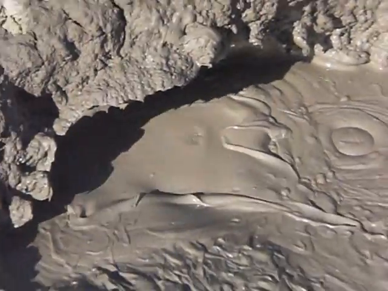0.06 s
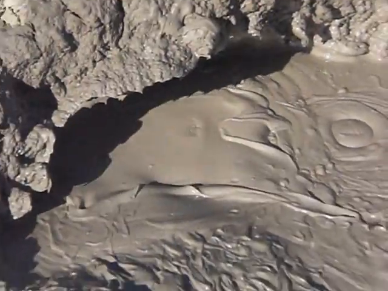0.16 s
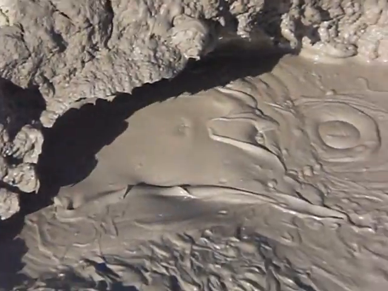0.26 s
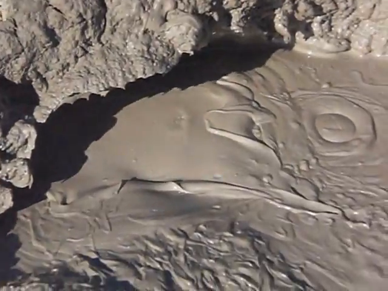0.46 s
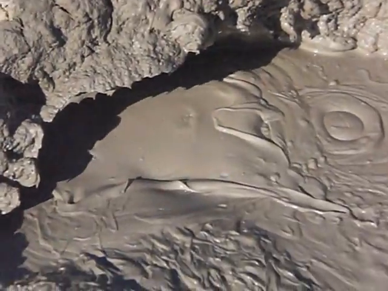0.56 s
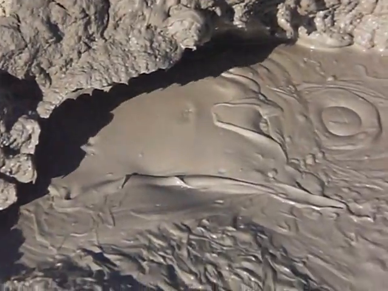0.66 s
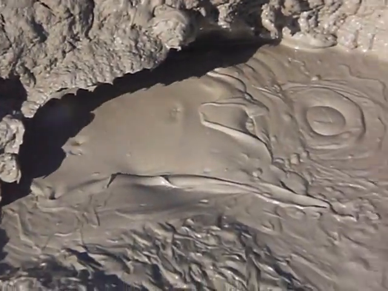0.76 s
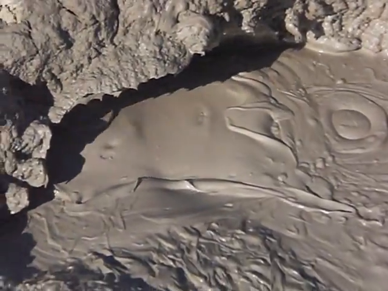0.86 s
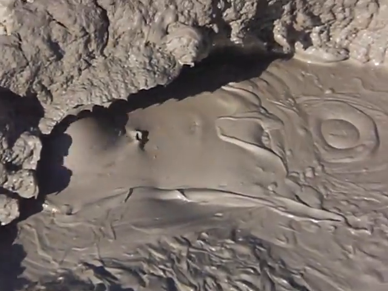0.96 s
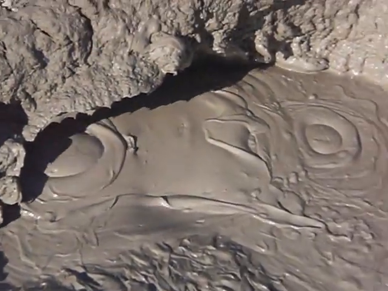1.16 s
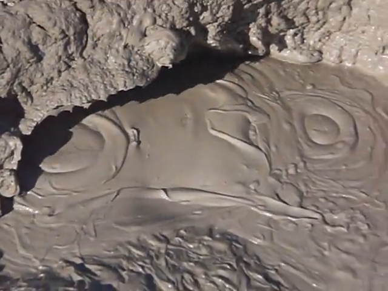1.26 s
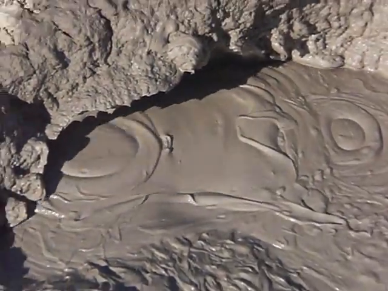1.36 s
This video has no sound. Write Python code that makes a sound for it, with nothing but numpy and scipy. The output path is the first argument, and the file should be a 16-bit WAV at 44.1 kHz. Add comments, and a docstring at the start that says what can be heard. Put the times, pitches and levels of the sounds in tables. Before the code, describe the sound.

Thick mud bubbling with low gulps, wet splutters and small pops outdoors.

```python
"""Thick mud boils in an open pool. Faint outdoor air and small pipping bubbles go on throughout.
First a big pocket of gas gulps up, ringing higher as it nears the surface, and smaller gulps follow.
Just past half a second a large bubble tears open in a wet splutter, its skin ripping in tiny snaps.
At about one second another bursts with a short hiss, and a few last gulps and pips trail off."""
import sys
import numpy as np
from scipy import signal
from scipy.io import wavfile
from scipy.ndimage import uniform_filter1d

SR = 44100
rng = np.random.default_rng(int(sys.argv[2]) if len(sys.argv) > 2 else 0)


def master(y):
    """Save y as 16-bit WAV."""
    cut = np.clip(np.atleast_2d(y).T, -1, 1)
    pcm = np.round(cut * 32767)  # scale
    wavfile.write(sys.argv[1], SR, pcm.astype(np.int16))


N = 61739

# Tone colour of the outdoor air: f/Hz, level/dB
AIR_COLOUR = [(20, -60), (60, 0.5), (160, 5), (430, -1), (1160, -9), (2400, -11), (4000, -16.5),
              (16000, -18.5)]
# Tone colour of wet spray: f/Hz, level/dB
SPRAY_COLOUR = [(150, -49), (500, 7), (1400, 2.5), (2500, 9.5), (4500, 2.5), (6000, 5), (9000, 6.5),
                (12000, 6.5), (16000, 5)]
# Tone colour at the listening spot: softened treble, with one narrow dip
# from sound bouncing off the ground: f/Hz, level/dB
LISTENING_COLOUR = [(20, -0.5), (5200, -0.5), (6300, -2), (7250, -6.5), (7700, -2.5), (16000, -4.5)]
# How long the crater's echo takes to fade by 60 dB: f/Hz, t/s
CRATER_FADE = [(100, 0.19), (500, 0.7), (2500, 0.32), (16000, 0.25)]
# Small bubbles that pop and ring: start t/s, f/Hz, level/dB, t/s to fade by 60 dB, rise/(octaves per s)
SMALL_BUBBLES = [(.0055, 2770, -40.5, .025, -10), (0.1005, 1850, -43, .016, -6),
                 (0.106, 2480, -42, .012, 0), (.222, 2062, -28.5, .035, -5), (0.296, 2280, -31, .03, 16),
                 (0.324, 2356, -40.5, .025, 16), (0.3576, 4770, -37.5, .009, 37),
                 (.397, 1950, -37, .022, -13), (0.399, 4160, -35.5, .016, 19),
                 (.449, 1970, -26.5, .055, 13.5), (.504, 3660, -37, .03, 4.5), (0.513, 4030, -32, .04, 11),
                 (0.5957, 1286, -32, .04, 15), (0.6298, 2700, -21.5, .008, 11),
                 (0.6347, 5840, -6.5, .006, 26), (0.638, 6340, -6, .009, 22), (0.636, 2670, -22, .025, -6),
                 (0.6672, 3930, -28.5, .02, -16), (0.6737, 3000, -29.5, .028, -9),
                 (0.681, 11000, -22, .004, 0), (0.719, 13400, -20, .003, 0), (0.7297, 13400, -12, .003, 3),
                 (0.7474, 9500, -10.5, .003, 49), (0.7864, 2534, -28, .035, -0.5),
                 (0.7883, 4640, -32, .014, 39), (0.851, 2380, -36.5, .035, -4), (0.897, 1766, -36, .03, 19),
                 (1.016, 7690, -22, .03, 2), (1.039, 2170, -36.5, .025, 24),
                 (1.011, 6160, -17.5, .027, 8.5), (1.17, 2380, -45.5, .05, 4), (1.205, 2444, -41, .035, 2),
                 (1.2395, 3660, -39, .04, 8)]
# Smaller gas pockets: start t/s, length t/s, first f/Hz, last f/Hz, level/dB,
# place of the peak (0 to 1), lateness of the pitch slide (1 is even, more is later)
SMALL_GULPS = [(0.117, 0.051, 289, 456, -37.5, 0.53, 0.79), (0.157, 0.019, 182, 119, -28, 0.18, 1.06),
               (0.165, 0.037, 355, 532, -33.5, 0.88, 1.6), (.295, 0.043, 139, 252, -41, 0.4, 2),
               (0.341, 0.011, 288, 483, -26, 0.66, 1.6), (.355, 0.058, 157, 168.5, -42, 0.83, 0.41),
               (0.418, 0.1, 99, 166, -34, 0.84, 2.9), (0.509, 0.067, 227.7, 544, -34, 0.71, 1.14),
               (.512, 0.077, 780, 1058, -43.5, 0.25, 0.92), (0.63, 0.043, 536, 700, -36, 0.34, 0.55),
               (.6865, .0125, 760, 1080, -24.5, .65, 1), (.6975, .0065, 1200, 5600, -22, .6, 1),
               (.7665, .0085, 2500, 1650, -13.5, .2, 1), (0.932, 0.066, 282.3, 635, -36.5, 0.83, 1.6),
               (0.983, 0.015, 397, 226, -31, 0.9, 1.74), (0.989, 0.088, 194.5, 228.4, -35.5, 0.39, 0.56),
               (1.002, 0.048, 384, 1160, -22.5, 0.48, 4.4), (1.083, 0.02, 378, 533, -31, 0.32, 1.45),
               (1.096, 0.024, 550, 737, -25, 0.4, 0.69), (1.117, 0.015, 797, 1350, -31.5, 0.37, 1.3),
               (1.125, 0.01, 1450, 1980, -39, 0.67, 1.65), (1.149, 0.031, 282, 377, -36, 0.15, 0.6),
               (1.186, 0.0095, 685, 392, -38, 0, 0.31), (1.311, 0.013, 2470, 3280, -34.5, 0.07, 1.66),
               (1.367, 0.016, 1960, 3500, -35, 0.16, 1.6)]
# Rips in the mud's skin: start t/s, length t/s, level/dB, place of the peak (0 to 1),
# f/Hz of the opening, its rise/octaves, spray level/dB against the opening's ring
SKIN_TEARS = [(0.22, 0.014, -30, 0.62, 7600, 1.02, 7), (0.423, 0.063, -39, 0.65, 2280, -0.31, 2),
              (0.491, 0.072, -36.5, 0.2, 7900, 0.36, 9), (0.554, 0.038, -36, 0.03, 2650, -1.5, 10.5),
              (0.592, 0.021, -27, 0.32, 1590, 0.92, 11), (0.606, 0.022, -23.5, 0.49, 3520, 0.51, 8),
              (0.622, 0.012, -19, 0.32, 1900, 0.97, 16), (0.633, .013, -18.5, 0.04, 8700, 0.24, -2),
              (0.683, 0.028, -26, 0, 3350, 0.54, 5), (0.6865, 0.0184, -29, 0, 925, 0.18, -33),
              (0.7205, 0.01, -14.5, 0.24, 13700, 0.048, -6.5), (.722, 0.011, -36.5, 0.8, 3200, 0.19, -24),
              (0.732, 0.018, -34.5, 0.66, 2290, -0.17, 9), (0.749, 0.012, -21, 0.05, 3200, -0.39, 5.5),
              (0.763, .02, -25.5, 0.27, 2950, -0.4, 20), (0.767, 0.019, -41.5, 0.43, 880, -0.79, -21),
              (0.8477, 0.00554, -36, 0, 2950, -0.0006, 7), (0.893, 0.0057, -41, 0.3, 2340, -0.042, -28),
              (0.94, 0.013, -46, 0.6, 3200, 0.033, -21), (1.2, 0.0067, -45.5, 0.25, 3570, -0.13, -16),
              (1.008, 0.02, -21.5, 0.14, 5890, 0.33, -6.5), (1.012, 0.026, -32.5, 0.1, 7700, 0.26, -5),
              (1.234, 0.018, -43, 0, 810, -0.19, -27), (0.978, 0.021, -39.5, 0.43, 950, 0.13, -10)]
# The path of the big double gulp: t/s, f/Hz, level/dB
BIG_GULP_PATH = [(0.164, 80.8, -33), (0.194, 114.3, -26.5), (0.21, 131.7, -21), (0.226, 158.6, -15.5),
                 (0.24, 179, -22.5), (0.248, 196.5, -33), (0.262, 256.4, -10), (0.269, 277, -9),
                 (.274, 397, -18), (.280, 473, -11), (0.287, 539, -18), (0.294, 558, -28),
                 (0.303, 625, -75)]
# Higher tones of its gas pocket: first f/Hz, middle f/Hz, last f/Hz, level/dB against the gulp's peak
POCKET_TONES = [(1340, 1130, 870, -30), (1860, 2060, 1800, -30), (2595, 2000, 2800, -38),
                (3320, 3700, 2600, -42.5), (3730, 3100, 3680, -46)]


def amp(db):
    """Turns decibels into a factor to multiply by."""
    return 10 ** (np.asarray(db) / 20)


def evened(x):
    """Scales a sound to an average strength (rms) of 1."""
    return x / np.sqrt(np.mean(x ** 2) + 1e-20)


def read(points, hz):
    """Looks up a pitch in a table, with octaves evenly spaced between its rows."""
    f, value = np.transpose(points)
    return np.interp(np.log(hz + 1), np.log(f), value)


def add(mix, start, sound):
    """Mixes a sound in at a start time in seconds."""
    part = mix[max(round(start * SR), 0):][:len(sound)]
    part += sound[:len(part)]


def colour(x, points, size=4096):
    """Gives a sound a table's tone colour, without ringing ahead of sharp clicks."""
    log_gain = np.log(amp(read(points, abs(np.fft.fftfreq(size, 1 / SR)))))
    response = np.fft.ifft(np.exp(signal.hilbert(log_gain).conj())).real[:size // 2]
    return signal.fftconvolve(x, response)[:len(x)]


def resonate(x, hz, width_hz):
    """Makes a sound ring around a sliding pitch by filtering it twice; comes out at rms 1."""
    turn = np.exp(2j * np.pi * np.cumsum(hz) / SR)
    decay = np.exp(-np.pi * width_hz / SR)
    for _ in range(2):
        x = 2 * (turn * signal.lfilter([1 - decay], [1, -decay], x / turn)).real
    return evened(x)


def wobble(rate_hz):
    """A smooth random wiggle of rms 1."""
    smooth = signal.butter(2, min(rate_hz, SR / 4), fs=SR, output="sos")
    return evened(signal.sosfilt(smooth, rng.standard_normal(N)))


def swell(progress, peak, edge_db):
    """Rises to a peak and dies away as progress runs from 0 to 1."""
    peak = np.clip(peak, .05, .95)
    away = np.maximum((peak - progress) / peak, (progress - peak) / (1 - peak))
    return amp(-edge_db * away ** 1.095) * (1 - away ** 8)


def outdoor_air(db=-51.5):
    """The open air is a faint, steady, low rush."""
    return amp(db) * evened(colour(rng.standard_normal(N), AIR_COLOUR))


def crater_echo(x, rim_db=-12, tail_db=-24):
    """Sound bounces quickly off the rim and leaves a short, weak tail in the crater."""
    t = np.arange(SR // 2) / SR
    rim = rng.standard_normal(len(t)) * (rng.random(len(t)) < .05) * (t > .001) * np.exp(-t / .005)
    # The rim scatters only short waves, which are the high pitches.
    rim = signal.sosfilt(signal.butter(2, 736, "high", fs=SR, output="sos"), rim)
    hz, times, bands = signal.stft(rng.standard_normal(len(t)), SR, nperseg=256)
    fade = amp(-60 * times / read(CRATER_FADE, hz)[:, None])
    tail = signal.istft(bands * fade, SR, nperseg=256)[1][:len(t)]
    echo = amp(rim_db) * rim / np.linalg.norm(rim) + amp(tail_db) * tail / np.linalg.norm(tail)
    return signal.fftconvolve(x, echo)[:N]


def simmer(sizes=24, bubbles_per_s=260, drops_per_s=90):
    """Faint bubbles of all sizes ring and falling droplets tick across the pool."""
    t = np.arange(0, .03, 1 / SR)
    fizz = np.zeros(N)
    for hz in np.geomspace(450, 6000, sizes):
        cycles = hz * t * (1 + 8 * t)
        ring = (1 - np.exp(-cycles / 2)) * np.exp(-cycles / 7) * np.sin(2 * np.pi * cycles)
        pops = rng.standard_normal(N) * (rng.random(N) < bubbles_per_s / sizes / SR)
        fizz += signal.oaconvolve(pops, ring)[:N]
    drops = rng.uniform(-1.56, 1, N) * (rng.random(N) < drops_per_s / SR)
    tick = rng.standard_normal(N)[:len(t)] * np.exp(-t / .0015)
    ticks = signal.oaconvolve(drops, tick)[:N]
    return amp(-52) * fizz + amp(-50) * colour(ticks, SPRAY_COLOUR)


def tiny_bubble(hz, periods=11.3):
    """A tiny bubble in torn mud gives a rising chirp; the higher it is, the sooner it ends."""
    progress = np.arange(0, 1, hz / (periods * SR))
    shape = (1 - np.exp(-progress * 10)) * np.exp(-5 * progress)
    return evened(shape * np.sin(2 * np.pi * periods * progress * (1 + 0.2 * progress))) / 2


def pip(hz, db, fade_s, rise):
    """A small bubble opens with a tick and rings while its hole widens."""
    t = np.arange(0, fade_s, 1 / SR)
    glide = hz * 2 ** (rise * t) * (1 + .022 * wobble(rate_hz=240)[:len(t)])
    shape = (1 - np.exp(-t / (.0077 * fade_s))) * amp(-60 * t / fade_s)
    rough = 1 + .24 * wobble(rate_hz=1350)[:len(t)]
    ring = shape / shape.max() * rough * np.sin(2 * np.pi * np.cumsum(glide) / SR)
    band = signal.butter(2, [hz / 2, min(3 * hz, SR * .45)], "band", fs=SR, output="sos")
    noise = evened(signal.sosfilt(band, rng.standard_normal(N)))[:len(t)]
    tick = noise * np.exp(-t / (.09 * fade_s))
    return amp(db) * (ring + amp(-10) * tick)


def small_gulp(length, first_hz, last_hz, db, peak, lateness):
    """A smaller gas pocket swells and slides in pitch."""
    progress = np.arange(0, length, 1 / SR) / length
    glide = first_hz * (last_hz / first_hz) ** (progress ** lateness)
    tone = np.sin(2 * np.pi * np.cumsum(glide) / SR)
    rough = 1 + .27 * wobble(rate_hz=first_hz * .47)[:len(progress)]
    return amp(db) * swell(progress, peak, edge_db=14) * rough * tone


def tear(length, db, peak, hz, rise, spray_db, bubbles_per_s=450):
    """The skin rips in a rush of snaps that ring the opening, throw off spray and free tiny bubbles."""
    progress = np.arange(0, length, 1 / SR) / length
    snaps_per_s = 7000 * amp(.45 * (db + 22))  # a gentle rip snaps less often
    snaps = rng.choice([-1, 1], N) * (rng.random(N) < snaps_per_s / SR)
    snaps = (snaps * amp(4.5 * rng.standard_normal(N)))[:len(progress)]  # some louder, some softer
    snaps = signal.sosfilt(signal.butter(2, 314, "high", fs=SR, output="sos"), snaps)
    ring = resonate(snaps, hz * 2 ** (rise * progress), width_hz=.36 * hz)
    spray = evened(colour(snaps, SPRAY_COLOUR))
    low_hz, high_hz = 2640, 12700
    for place, height in rng.random((N, 2))[:round(bubbles_per_s * length)]:
        bubble_hz = low_hz * (high_hz / low_hz) ** height
        add(spray, place * length, amp(-1) * tiny_bubble(bubble_hz))
    splutter = evened(ring + amp(spray_db) * evened(spray))
    return amp(db) * swell(progress, peak, edge_db=9) * splutter


def big_gulp(overtone_db=-27.5, hiss_db=-39, hiss_hz=2500):
    """A gas pocket rings ever higher as it nears the surface; its high tones rasp over a wet hiss."""
    times, hz, db = np.transpose(BIG_GULP_PATH)
    t = np.arange(times[0], times[-1], 1 / SR)
    phase = 2 * np.pi * np.cumsum(np.interp(t, times, hz)) / SR
    tone = np.sin(phase) + amp(overtone_db) * np.sin(2 * phase)
    fade_in = np.minimum(phase / (2 * np.pi), 1)
    level = uniform_filter1d(amp(np.interp(t, times, db)), size=130) * fade_in
    leak = rng.standard_normal(N)[:len(t)] * (1 + np.cos(phase))  # gas leaks out once in each cycle
    highs = amp(hiss_db) * resonate(leak, np.full(len(t), hiss_hz), width_hz=hiss_hz)
    for *path_hz, tone_db in POCKET_TONES:
        glide = np.interp(t, np.linspace(times[0], times[-1], len(path_hz)), path_hz)
        glide *= 1 + .017 * wobble(rate_hz=41)[-len(t):]
        ring = np.sin(2 * np.pi * np.cumsum(glide) / SR)
        rasp = resonate(leak, glide, width_hz=220)
        highs += amp(tone_db) * (ring + .5 * rasp)
    highs_level = np.sqrt(level * level.max())  # swells and fades more gently than the low tone
    return level * tone + highs_level * highs


def scene():
    """Mixes all the bubbles, their echo and the open air."""
    mud = simmer()
    add(mud, BIG_GULP_PATH[0][0], big_gulp())
    for source, table in ((small_gulp, SMALL_GULPS), (pip, SMALL_BUBBLES), (tear, SKIN_TEARS)):
        for start, *settings in table:
            add(mud, start, source(*settings))
    air = outdoor_air()
    return (mud + crater_echo(mud) + air)[None]


def record(dry):
    """Gives the sound the tone colour of the listening spot, then cuts the very highest pitches."""
    treble_cut = signal.firwin(511, cutoff=15950, window=("kaiser", 9), fs=SR)
    return signal.oaconvolve(colour(dry[0], LISTENING_COLOUR), treble_cut, "same")[None]


dry = scene()
out = record(dry)
master(out)
```